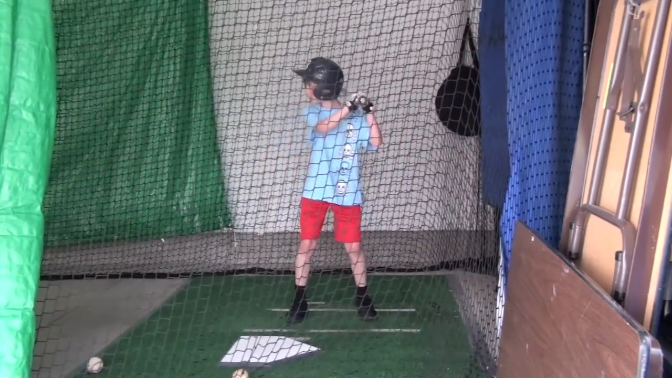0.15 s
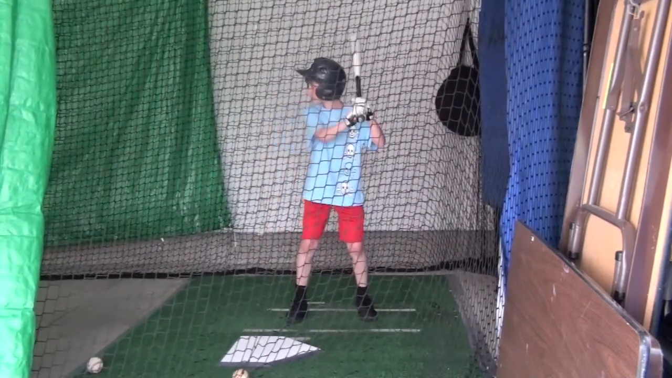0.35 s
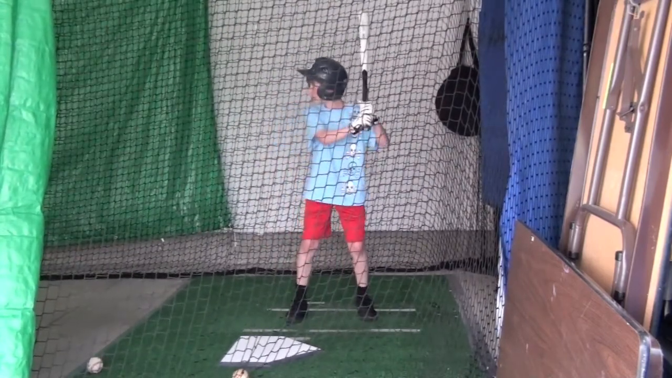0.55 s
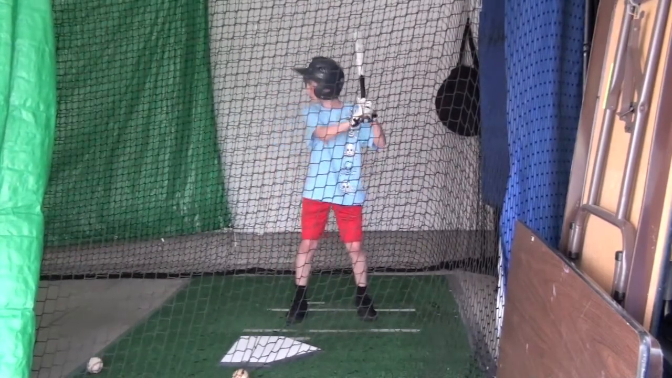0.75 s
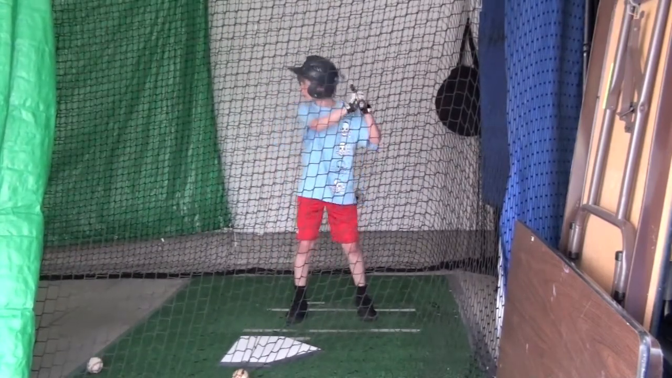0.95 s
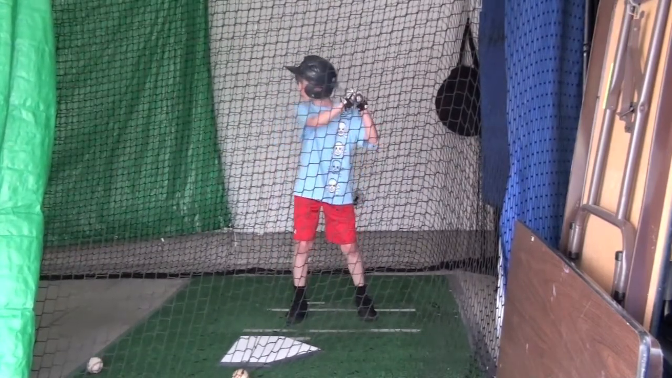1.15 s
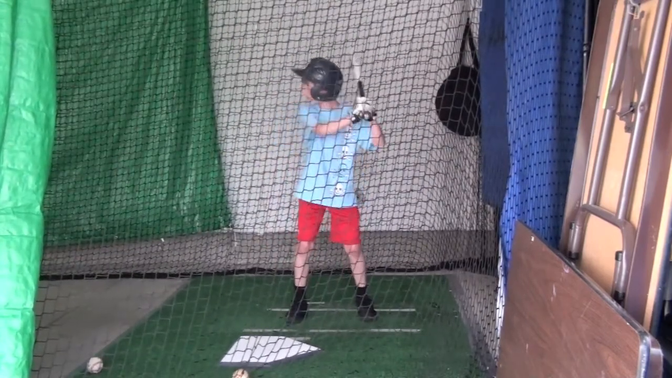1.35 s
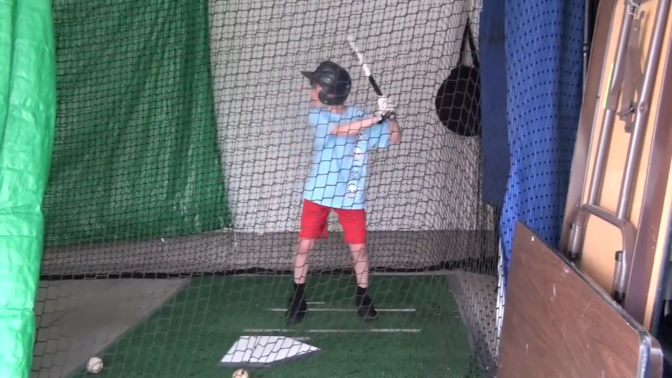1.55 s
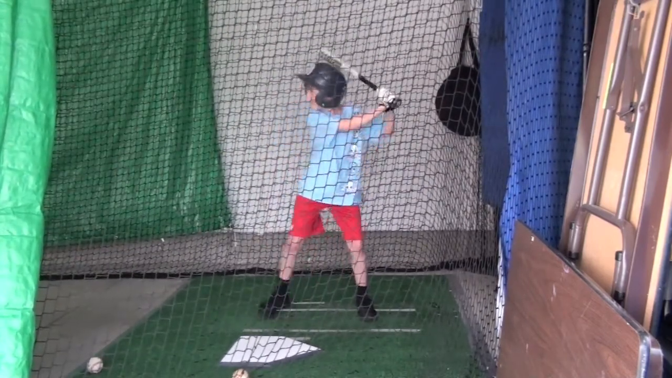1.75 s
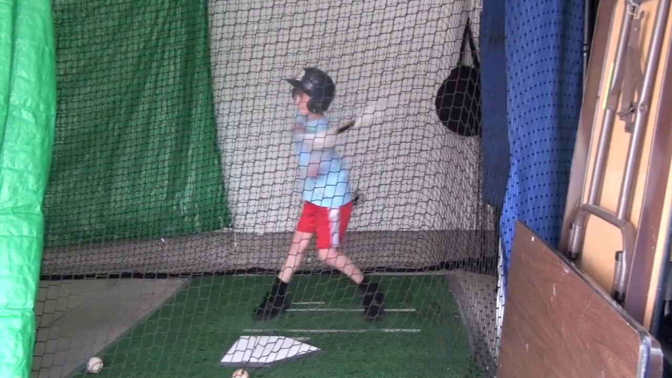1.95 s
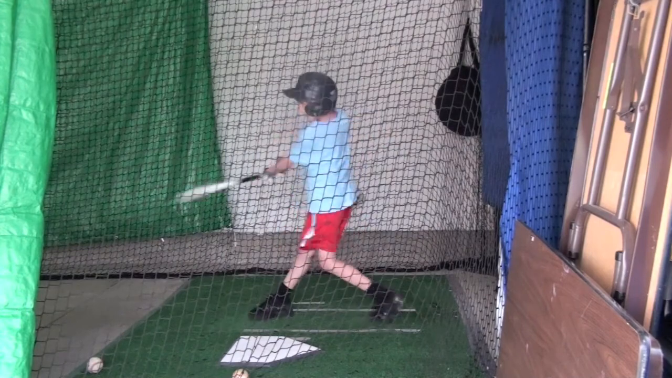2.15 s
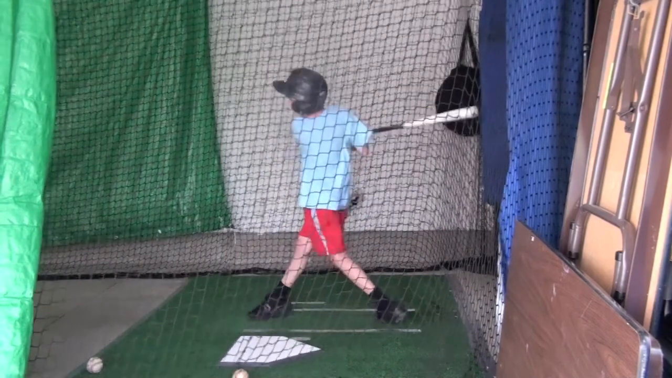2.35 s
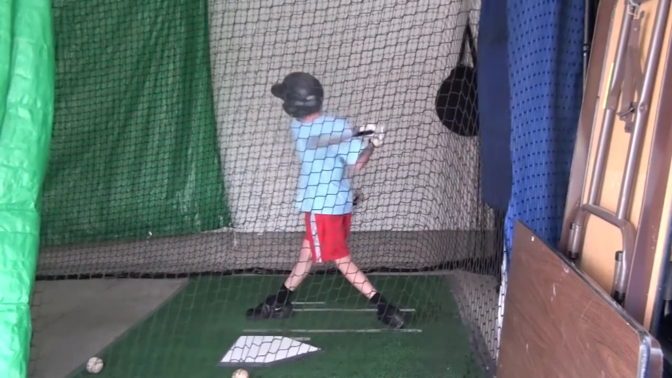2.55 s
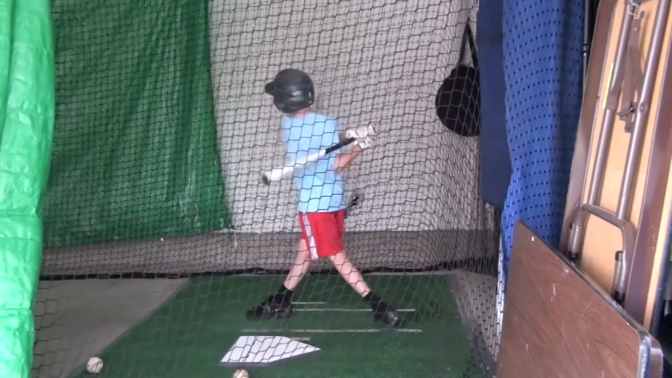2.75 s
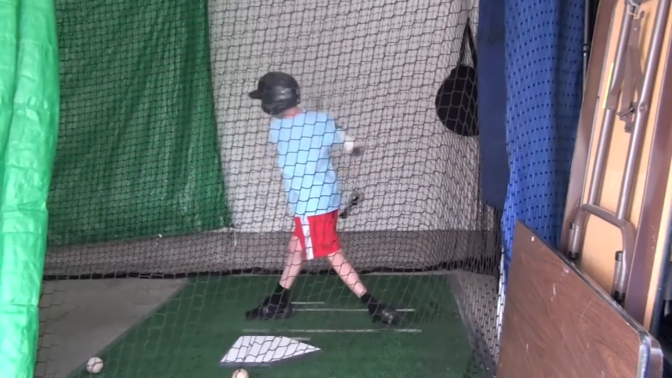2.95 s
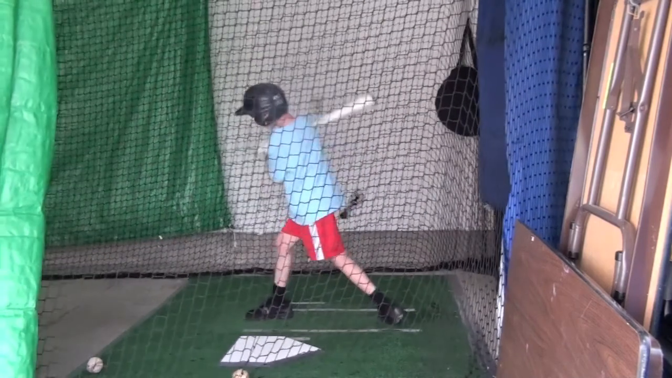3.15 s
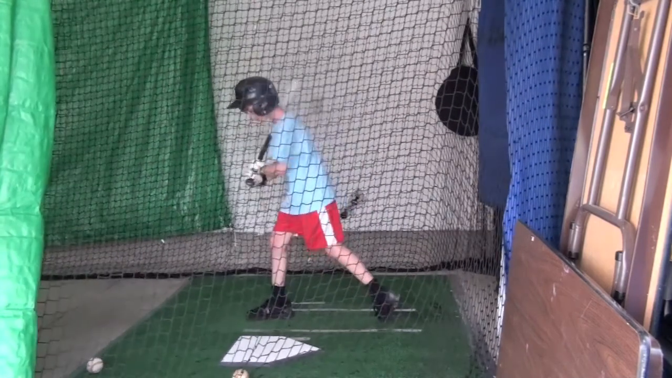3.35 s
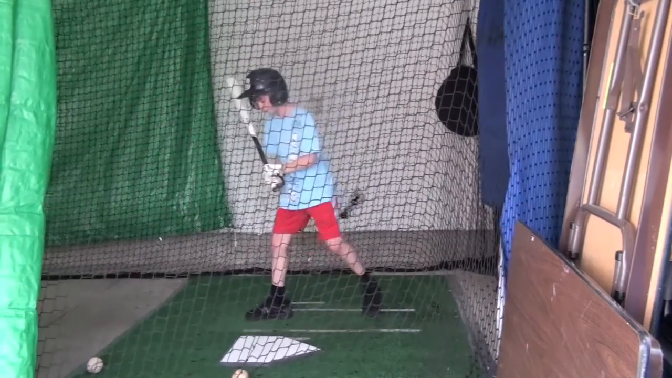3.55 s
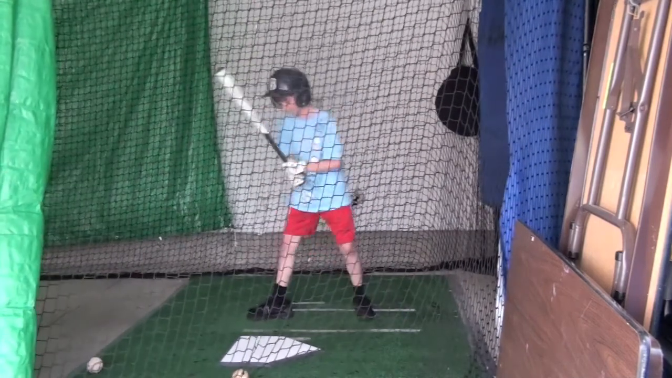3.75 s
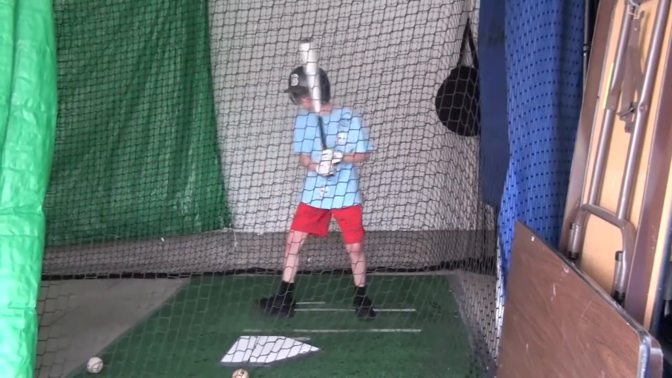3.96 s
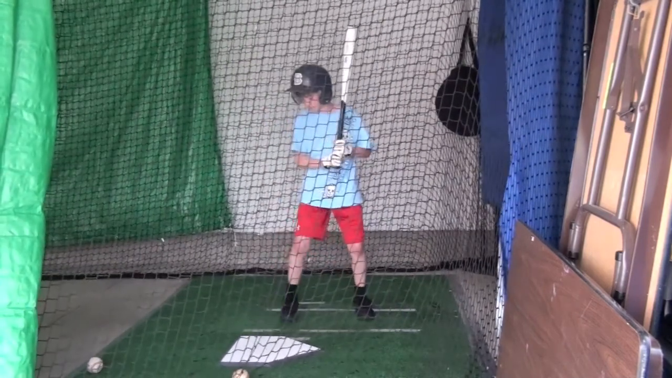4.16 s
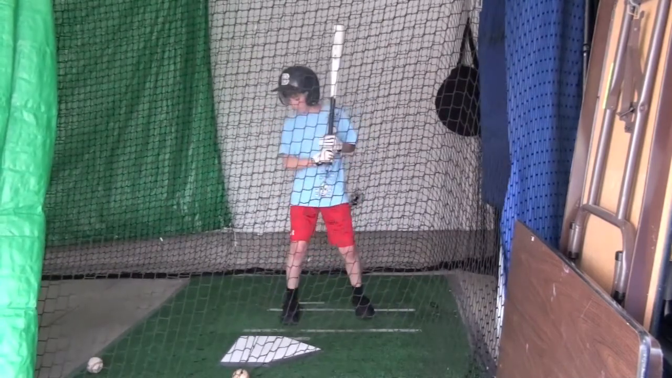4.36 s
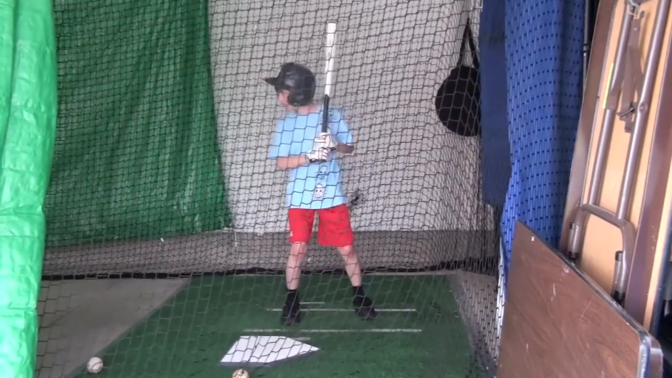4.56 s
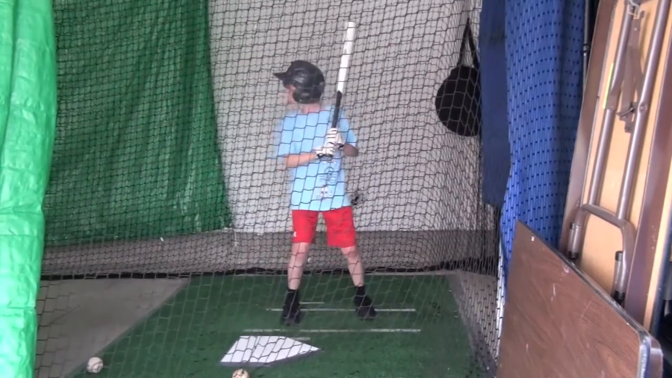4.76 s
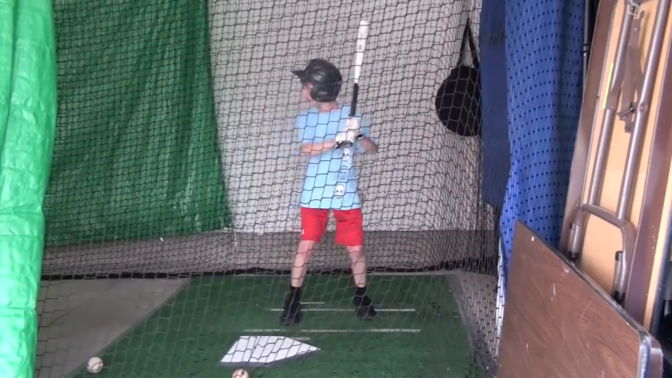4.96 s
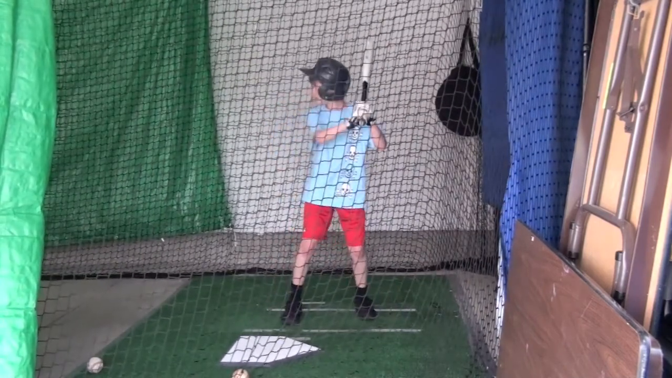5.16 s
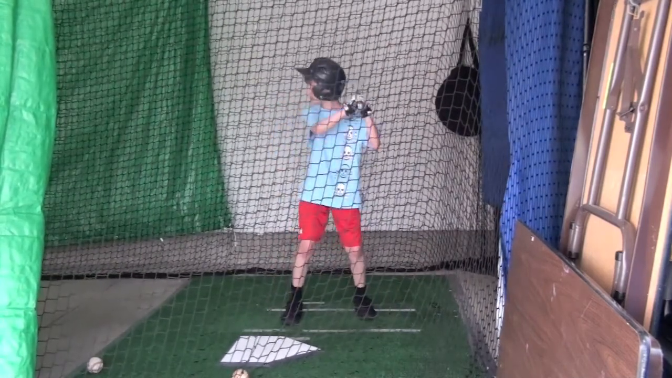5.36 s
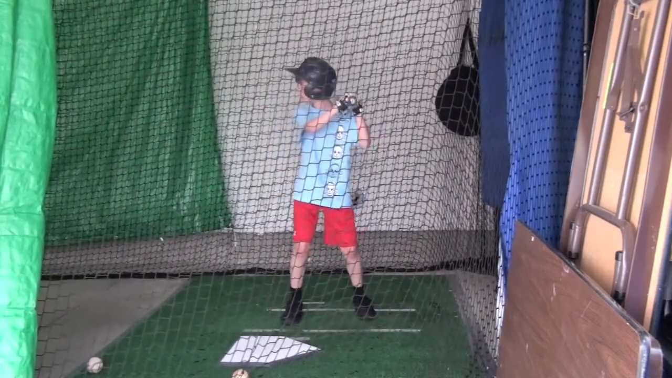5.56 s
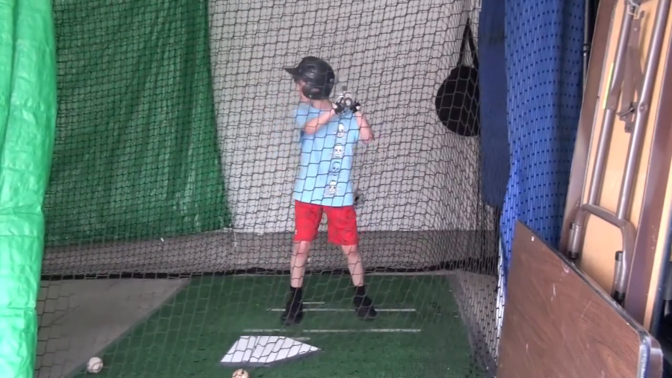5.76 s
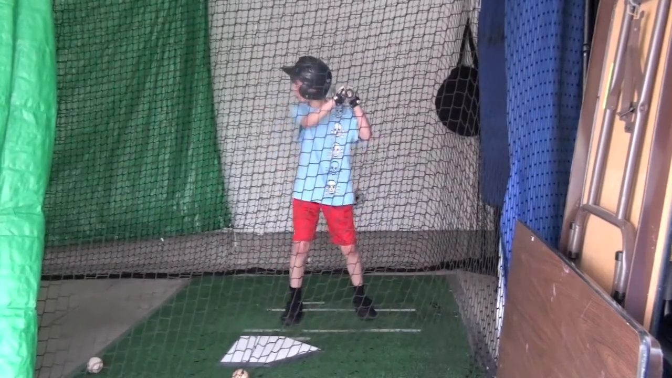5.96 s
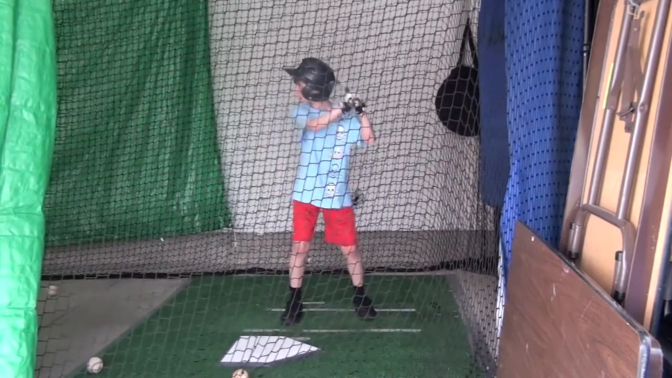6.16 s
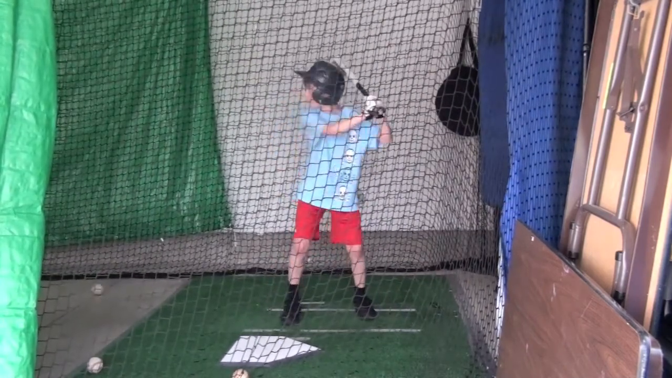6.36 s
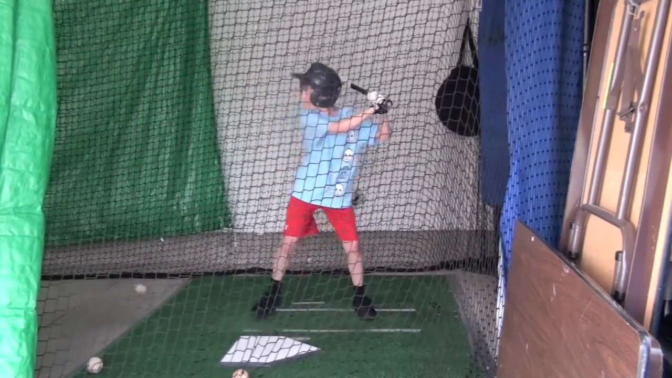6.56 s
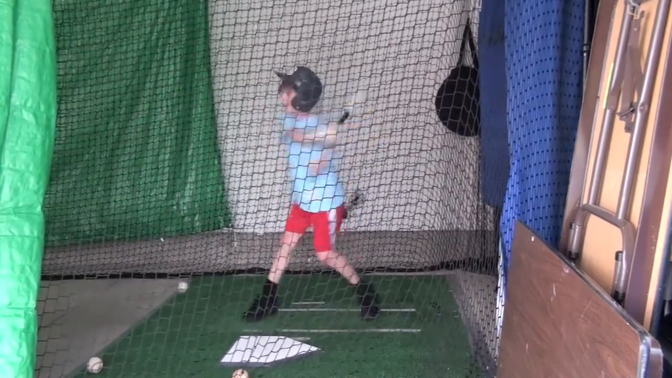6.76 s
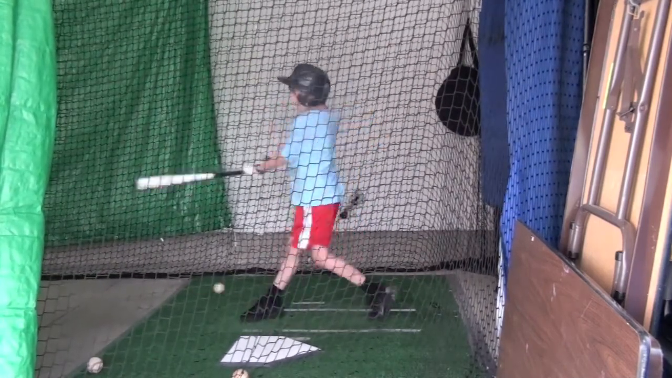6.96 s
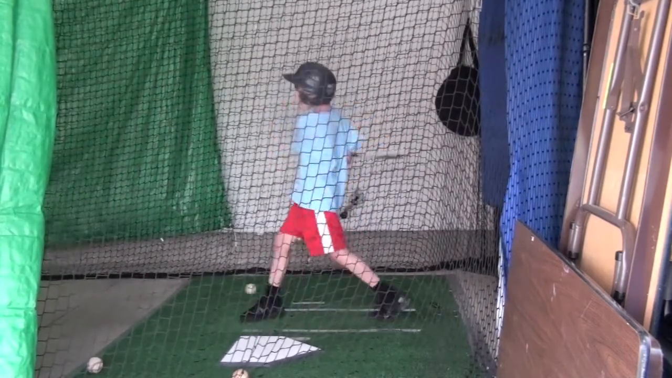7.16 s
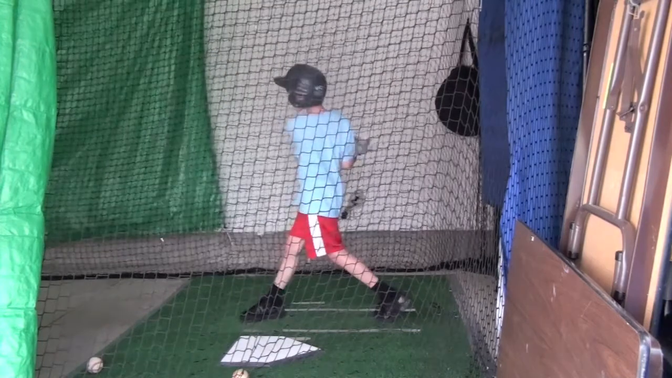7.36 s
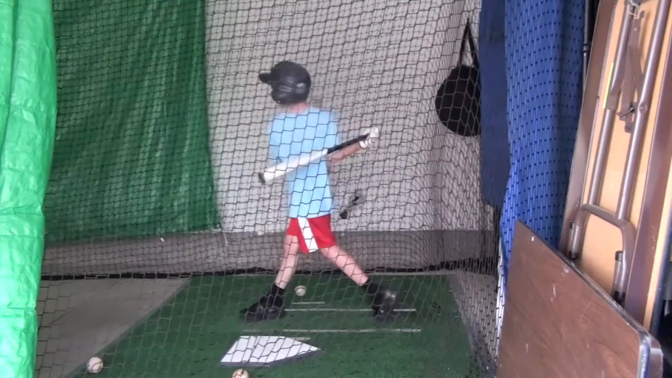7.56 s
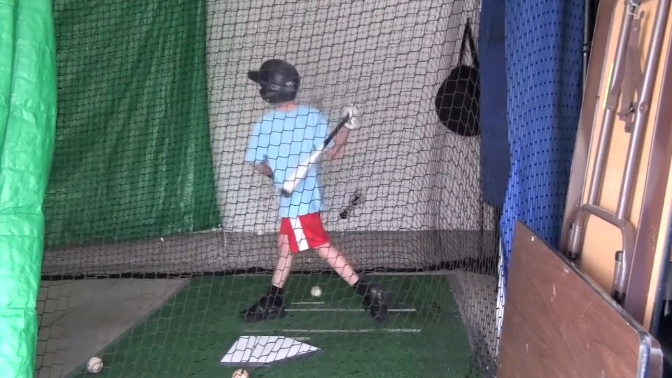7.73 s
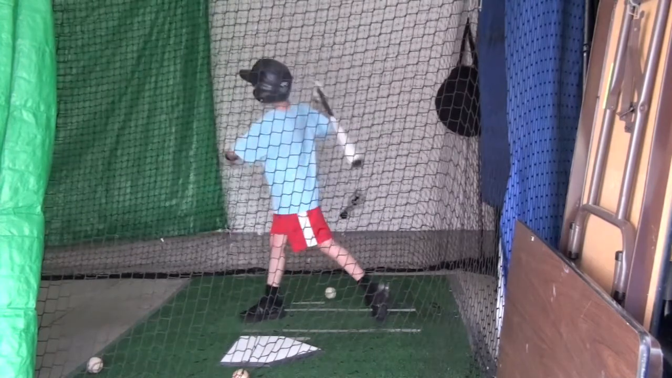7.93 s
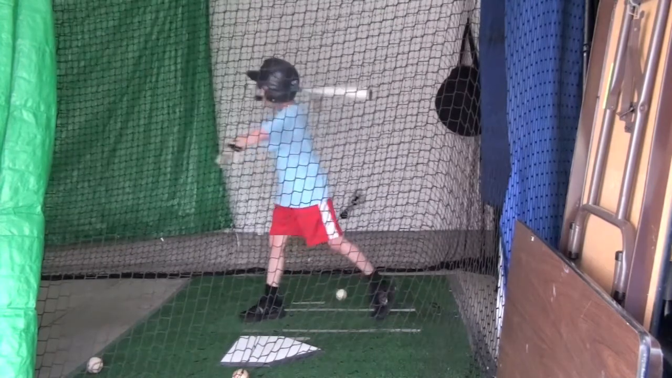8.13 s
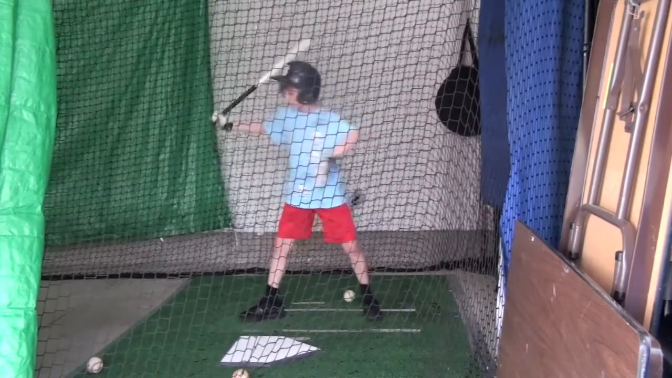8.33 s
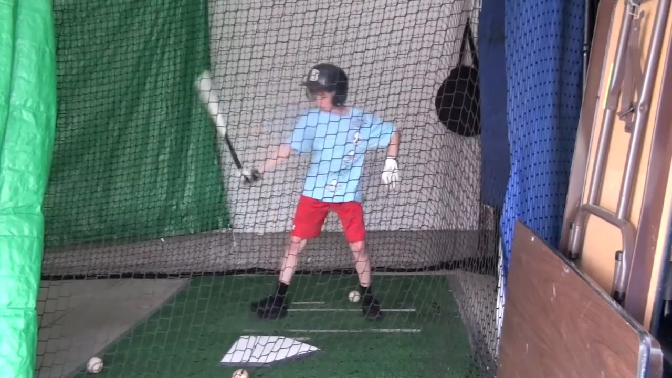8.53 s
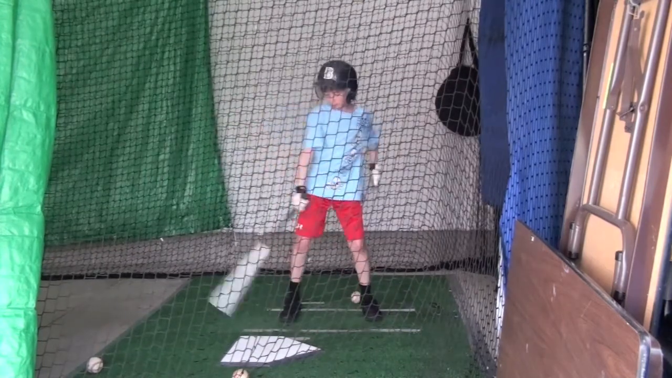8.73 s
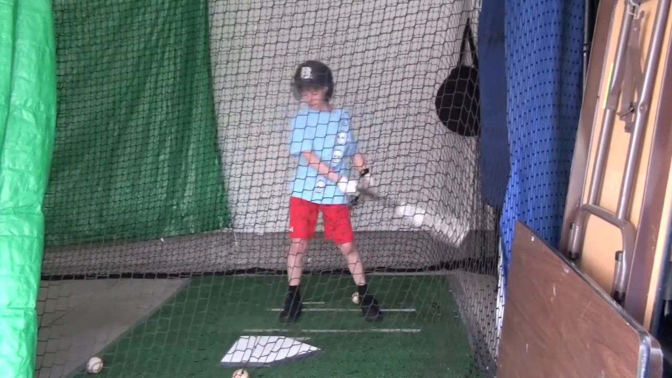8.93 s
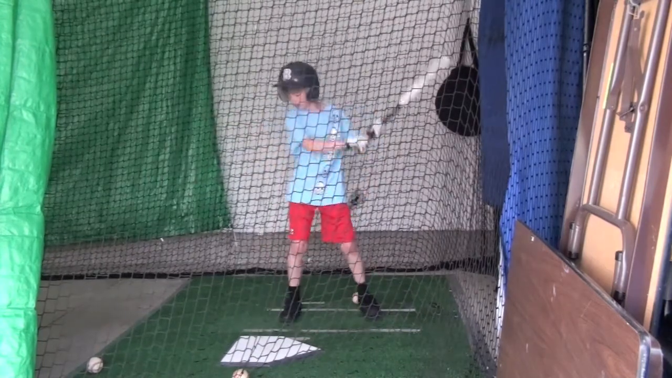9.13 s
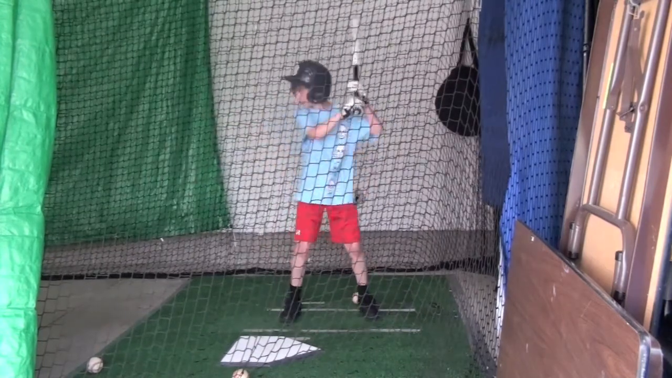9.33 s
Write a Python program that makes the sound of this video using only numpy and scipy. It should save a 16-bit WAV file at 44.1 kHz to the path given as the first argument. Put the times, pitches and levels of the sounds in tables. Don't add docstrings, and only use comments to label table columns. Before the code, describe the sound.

Two bright ringing bat hits, seconds apart, break quiet garage air, followed by ball knocks, scuffing soles and dull fading bounces.

```python
import sys
import numpy as np
from scipy import signal
from scipy.fft import rfft, irfft
from scipy.io import wavfile
from scipy.ndimage import uniform_filter1d, map_coordinates

SR = 44100
rng = np.random.default_rng(int(sys.argv[2]) if len(sys.argv) > 2 else 0)


def store_wav(level_fs):
    pcm = np.round(np.clip(np.atleast_2d(level_fs), -1, 1) * 32767)
    wavfile.write(sys.argv[1], SR, pcm.T.astype(np.int16))


def gain_from_decibels(decibels):
    exponent = np.asarray(decibels, float) / 20
    return 10 ** exponent


N = 418509
TIME = np.arange(N) / SR

# (frequency [Hz], left-right correlation [-1..1])
ROOM_LIKENESS = [(100, .8), (200, 0.94), (600, 0.78), (3000, 0.79), (9000, 0.78), (14000, 1)]


def unit(x):
    return x / np.sqrt(np.mean(x ** 2) + 1e-20)


def along(points, hz):
    f, v = np.transpose(points)
    return np.interp(np.log(hz + 1), np.log(f + 1), v)


def curve(rows, t):
    s, v = np.transpose(rows)
    return np.interp(t, s, v)


def wobble(rate_hz, size=N):
    knots = rng.standard_normal(int(size * rate_hz / SR) + 4)
    return map_coordinates(knots, [TIME[:size] * rate_hz])


def fade(t, start_s, end_s, edge_s):
    return np.clip((t - start_s) / edge_s, 0, 1) * np.clip((end_s - t) / edge_s, 0, 1)


def add(out, s, x):
    place = out[..., round(s * SR):][..., :x.shape[-1]]
    place += x[..., :place.shape[-1]]


def pair(size, spectrum, likeness):
    hz = np.fft.rfftfreq(size, 1 / SR)
    angle = np.arccos(np.clip(along(likeness, hz), -1, 1)) / 2
    noise = rfft(rng.standard_normal((2, size))) * gain_from_decibels(along(spectrum, hz))
    mid, side = irfft(noise * [np.cos(angle), np.sin(angle)], size)
    return unit(np.array([mid + side, mid - side]))


def garage(spectrum, rise_s, direct_db, direct_t60_s):
    # (frequency [Hz], t60 [s])
    decay = [(150, 0.49), (400, 0.67), (1000, 0.74), (2800, 0.66), (7300, .55), (14000, 0.36)]
    size = 2 ** 15
    hz, frame_s, z = signal.stft(pair(size, spectrum, ROOM_LIKENESS), SR, nperseg=256)
    z = z * gain_from_decibels(-60 * frame_s / along(decay, hz)[:, None])
    tail = signal.istft(z, SR, nperseg=256)[1][:, :size]
    t = TIME[:size]
    build_up = 1 - np.exp(-t / rise_s)
    direct = gain_from_decibels(direct_db - 60 * t / direct_t60_s) * np.clip(3 * t / rise_s, 0, 1)
    return tail * (build_up + direct)


def blows(table, spectrum, direct_t60_s):
    out = np.zeros((2, N))
    for s, db, rise_s, direct_db, pan_db in table:
        gain = gain_from_decibels(db + np.array([[pan_db], [-pan_db]]) / 2)
        add(out, s, gain * garage(spectrum, rise_s, direct_db, direct_t60_s))
    return out


def roomy(x, wet_db):
    tail = garage([(100, 0.0099), (16000, 0.00099)], rise_s=0.0023, direct_db=-37.0, direct_t60_s=0.01)
    tail = tail / np.linalg.norm(tail[0])
    wet = signal.fftconvolve(x[None], tail, axes=1)[:, :len(x)]
    return x + gain_from_decibels(wet_db) * wet


def ringing(modes, db, attack_s):
    t = TIME[:SR]
    tones = np.zeros(SR)
    for hz, level_db, t60_s in modes:
        strength_db = db + level_db + 2 * rng.standard_normal()
        tones += gain_from_decibels(strength_db - 60 * t / t60_s) * np.sin(2 * np.pi * hz * t)
    return tones * (1 - np.exp(-t / attack_s))


def outside():
    # (frequency [Hz], level [dB])
    air_colour = [(20, -39), (40, -8.5), (88, -10), (142, -6.5), (250, -4), (400, -13), (574, -17),
                  (900, -27), (1610, -24), (3070, -28), (7520, -37), (15000, -41.5), (15700, -54),
                  (15900, -89)]
    # (frequency [Hz], level [dB])
    car_colour = [(120, -42), (200, -14), (264, -1), (601, -10.5), (1070, -7.5), (2110, -15), (2560, -21.5),
                  (3960, -22.5), (10500, -39), (13000, -40)]
    # (frequency [Hz], left-right correlation [-1..1])
    likeness = [(60, 0.99), (150, 1), (380, 0.96), (950, 0.68), (2380, 0.58), (5980, 0.49), (15000, 0.74)]
    # (time [s], level [dB])
    breeze = [(0, 0.5), (3, -1), (5, 1), (7, -0.5), (8, -5), (9.49, -2)]
    air_db = -45.5 + curve(breeze, TIME) + 0.94 * wobble(6)
    car_db = -40 - 1.82 * TIME + 0.56 * wobble(4.04)
    hum_db = -50 + 1.4 * wobble(2.46) + 1.6 * wobble(23)
    hum_hz = 59 + 0.67 * wobble(4.9)
    air = gain_from_decibels(air_db) * pair(N, air_colour, likeness)
    car = gain_from_decibels(car_db) * pair(N, car_colour, likeness)
    hum = gain_from_decibels(hum_db) * np.sin(2 * np.pi * np.cumsum(hum_hz) / SR)
    return air + car + hum


def note(s, length_s, from_hz, to_hz, db, fade_db_per_s, trill):
    t = TIME[:round(length_s * SR)]
    slide_hz = to_hz + (from_hz - to_hz) * np.exp(-t / 0.03)
    hz = slide_hz * (1 + trill[round(s * SR):][:len(t)])
    level = gain_from_decibels(db - fade_db_per_s * t) * fade(t, 0, length_s, edge_s=0.008)
    return level * np.sin(2 * np.pi * np.cumsum(hz) / SR)


def birds():
    # (time [s], length [s], start [Hz], held pitch [Hz], level [dB])
    whistles = [
        (.11, .03, 4700, 4620, -51),
        (.58, .06, 4000, 4000, -58),
        (4.783, .13, 3880, 3970, -54),
        (5.394, .2, 4750, 4620, -64),
        (5.514, 0.17, 3750, 4260, -60),
        (6.239, 0.42, 2450, 3470, -46.5),
        (6.746, .12, 3150, 3460, -50),
    ]
    # (time [s], length [s], start [Hz], held pitch [Hz], level [dB])
    buzzes = [
        (1.38, 0.5, 2654, 2590, -48),
        (2.919, 0.57, 2600, 2670, -52.5),
        (5.196, 0.077, 3220, 3230, -59),
        (6.241, 0.15, 2550, 2990, -52),
        (6.612, 0.2, 2850, 3030, -49.5),
    ]
    # (time [s], level [dB])
    chips = [
        (5.3, -53),
        (5.56, -52),
        (5.73, -55),
        (5.891, -53),
        (6.06, -58),
        (6.22, -54),
    ]
    chip_s, chip_top_hz, chip_low_hz = 0.021, 3520, 2850
    song = np.zeros(N)
    trill_hz = 80 + 20 * wobble(40)
    phase = 2 * np.pi * np.cumsum(trill_hz) / SR + 0.78 * wobble(150)
    zigzag = np.arcsin(np.sin(phase)) * 2 / np.pi
    falling = [(s, chip_s, chip_top_hz, 2 * chip_low_hz - chip_top_hz, db) for s, db in chips]
    for row in whistles + falling:
        add(song, row[0], note(*row, fade_db_per_s=58, trill=0 * zigzag))
    for row in buzzes:
        add(song, row[0], note(*row, fade_db_per_s=0, trill=0.1204 * zigzag))
    return roomy(song * gain_from_decibels(3.5 * wobble(70)), wet_db=0.1)


def strokes(table):
    t = TIME[::64]
    s, db, rise_s, fall_s = np.transpose(table)[..., None]
    away = np.where(t < s, (s - t) / rise_s, (t - s) / fall_s)
    return np.interp(TIME, t, gain_from_decibels(db - 13 * away ** 1.16).sum(axis=0))


def shoes():
    # (peak time [s], level [dB], rise [s], fall [s])
    steps = [(1.9, -57, 0.038, 0.21), (2.14, -46, .25, 0.0093), (2.5, -48.5, .01, 0.63),
             (2.72, -55.5, 0.012, 0.21), (3.53, -56, .04, .04), (4.5, -58, .01, .13), (4.74, -63, .06, .08),
             (4.91, -58, .1, 0.14), (5.2, -56, .15, .06), (6.48, -58, 0.12, 0.088),
             (6.74, -56, 0.075, 0.22), (6.9, -47.5, 0.15, 0.18), (7.5, -51.5, 0.063, 0.23),
             (7.62, -54, 0.052, 0.071), (7.78, -49.5, 0.053, 0.22), (7.94, -62.5, 0.027, 0.19),
             (8.55, -58, 0.93, 0.054), (8.65, -55, 0.057, 0.043), (8.74, -50.5, 0.04, 0.24),
             (9.16, -56.5, 0.14, 0.14), (9.34, -54, 0.063, 0.14)]
    # (peak time [s], level [dB], rise [s], fall [s])
    slides = [
        (3.77, -44, 0.071, 0.22),
        (3.91, -44.5, 0.17, 0.16),
    ]
    # (frequency [Hz], level [dB])
    scuff_colour = [(470, -16), (800, -1), (1180, -2.5), (1900, -3), (3340, -5), (3830, -4.5), (11700, -15),
                    (15000, -23), (16000, -29)]
    # (frequency [Hz], level [dB])
    drag_colour = [(1180, -31), (2000, -12), (2780, -8), (3260, 1), (3550, -10.5), (4190, -3), (5210, -5),
                   (7190, -14.5), (7840, -16.5), (13800, -25.5), (15500, -37), (16000, -67)]
    grain = gain_from_decibels(0.79 * wobble(300) + 1.1 * wobble(40))
    scuffs = gain_from_decibels(5.0) * strokes(steps) * pair(N, scuff_colour, ROOM_LIKENESS)
    drags = strokes(slides) * pair(N, drag_colour, ROOM_LIKENESS)
    return grain * (scuffs + drags)


def balls():
    bursts = [
        (2.152, -20.5, .002, 23, 0),
        (2.164, -20.5, 0.0022, 14, 0),
        (7.17, -19, 0.048, -30, 0),
        (7.198, -12, 0.02, -30, 0.004),
        (7.25, -19.5, 0.0064, -25, 0.0033),
        (7.1, -25, 0.011, 6, 0),
        (2.825, -56, .006, 3, 0.0035),
        (7.616, -41, .004, 13, 0),
        (8.14, -52, .004, 9, 0),
    ]
    brushes = [
        (8.815, -34, 0.0079, -30, 0),
        (9.32, -39, 0.029, -30, 0),
    ]
    knocks = [
        (.001, -40, 0.0044, -13, 0.0046),
        (3.02, -33, 0.035, -30, 0.0067),
        (3.151, -37, .003, -1, 0),
        (3.158, -20, 0.0037, 5, 0),
        (3.176, -21, 0.0061, 6, 0.0066),
        (4.108, -32.5, 0.0052, 10, 0.014),
    ]
    taps = [
        (4.113, -24, 0.0094, -5, 0),
    ]
    bounces = [
        (7.265, -21.5, .01, -11, 3),
        (7.615, -30.5, 0.015, 5.5, -0.5),
        (7.933, -38.5, 0.014, 0, 0),
        (8.139, -45, .012, 1, 1),
        (8.268, -46.5, 0.014, 6, 1),
        (4.75, -49.5, 0.0082, -4, 0),
        (4.9, -50, .01, 9, -3),
        (6.24, -45, 0.023, -2, -2),
        (6.36, -44, 0.015, -2, 0),
    ]
    # (frequency [Hz], level [dB])
    mesh_colour = [(1180, -0.5), (2000, 3.5), (4120, -1.5), (7250, -7.5), (11900, -14), (14500, -19),
                   (16000, -63)]
    # (frequency [Hz], level [dB])
    brush_colour = [(290, -37), (500, -6), (718, -3.5), (933, -9), (1190, -3), (1340, -6), (1980, -5.5),
                    (2230, -11), (2430, -7), (2690, -12), (3060, -12), (11600, -17), (16000, -34.5)]
    # (frequency [Hz], level [dB])
    knock_colour = [(35, -54), (60, -25), (389, -8.5), (579, -4.5), (698, -9), (767, -8.5), (1380, -16.5),
                    (2710, -17), (3760, -25), (11800, -32.5), (14900, -39), (16000, -63)]
    # (frequency [Hz], level [dB])
    tap_colour = [(88, -33), (150, -3.5), (334, -4.5), (662, -3), (1480, -4.5), (1630, -6.5), (2400, -4.5),
                  (2700, -7.5), (7770, -10), (12900, -18), (16000, -34)]
    # (frequency [Hz], level [dB])
    thud_colour = [(47, -43), (80, -20), (167, -2.5), (253, 0.5), (504, -6.5), (853, -16), (1150, -20),
                   (1500, -41), (1950, -54), (3300, -120)]
    # (frequency [Hz], level over the room [dB], t60 [s])
    slab = [(165, 5, 0.13), (242, 8.5, 0.11), (321, -2, 0.1), (498, -4, 0.087), (643, -5, 0.068)]
    net = blows(bursts, mesh_colour, direct_t60_s=0.019) + blows(brushes, brush_colour, direct_t60_s=0.02)
    hard = blows(knocks, knock_colour, direct_t60_s=0.072) + blows(taps, tap_colour, direct_t60_s=0.18)
    soft = blows(bounces, thud_colour, direct_t60_s=0.09)
    for s, db, *_ in bounces:
        add(soft, s, ringing(slab, db, attack_s=0.005)[None])
    return net + hard + soft


def bat():
    # (time [s], room level [dB], build-up [s], direct burst [dB], left-right [dB])
    cracks = [
        (2.146, -1.5, 0.0057, 1, 1.5),
        (2.149, -8, 0.0029, 11, -8),
        (6.964, -2, 0.0029, -13, -1),
        (6.969, -16.5, 0.0026, 7, -3),
        (6.98, -12.5, 0.004, 3, 11.5),
    ]
    # (frequency [Hz], level [dB])
    crack_colour = [(88, -31), (150, -27), (431, -7), (1140, -7), (1660, -6), (2760, -11), (4080, -14),
                    (4950, -18.5), (7320, -23.5), (12200, -30), (16000, -49)]
    # (time [s], pitch [Hz])
    swings = [
        [(2.146, 1688), (2.2, 1745), (2.255, 1822), (2.305, 1763), (2.35, 1706), (2.45, 1694), (2.6, 1733),
         (2.95, 1745)],
        [(6.964, 1689), (7.02, 1702), (7.055, 1794), (7.085, 1701), (7.125, 1742), (7.185, 1724), (7.225, 1800),
         (7.3, 1730), (7.9, 1745)],
    ]
    # (level [dB], undamped hold [s], t60 in the hands [s], age when edge-on [s])
    rings = [
        (2, .11, 0.52, 0.0855),
        (0.5, 0.17, 0.48, 0.15),
    ]
    # (room level [dB], mirror wall level [dB])
    walls = [
        (-7, -7),
        (-7.5, -9.5),
    ]
    # (rest pitch [Hz], first hit [dB], second hit [dB], t60 [s], flutter [dB])
    barrel = [(2406, -10.5, -14, 0.47, 9), (2490, -9.5, -10, 0.59, 3), (3340, -21, -17, 0.24, 12),
              (4000, -5, -15, 0.41, 5.5), (4124, -11.5, -4.5, 0.52, 5), (4180, -18.5, -27, 0.57, 9),
              (7360, -39, -24, 0.33, 15.5)]
    # (time [s], modes as (frequency [Hz], level [dB], t60 [s]))
    touches = [
        (4.113, [(2390, -43, .28), (2440, -43, .3), (6300, -44, .3), (6550, -40, .45)]),
        (8.825, [(735, -49, .5), (1200, -49, .3), (1990, -53, .25), (2430, -55, .25), (8400, -62, .3), (9900, -56, .3), (11500, -60, .3)]),
        (9.35, [(1500, -52, .5)]),
    ]
    rest_hz, edge_dip_db, edge_s = 1745, 13, 0.0064
    age = TIME[:round(1.2 * SR)]
    pitches_hz = [rest_hz] + [mode[0] for mode in barrel]
    out = blows(cracks, crack_colour, direct_t60_s=0.016)
    for k, (swing, (room_db, wall_db)) in enumerate(zip(swings, walls)):
        start_s, end_s = swing[0][0], swing[-1][0]
        heard_hz = curve(swing, start_s + age)
        travel_s = np.cumsum(heard_hz / rest_hz - 1) / SR
        top_db, hold_s, t60_s, edge_on_s = rings[k]
        ring_db = top_db - 60 * np.maximum(0, age - hold_s) / t60_s
        ring_db -= edge_dip_db * np.exp(-((age - edge_on_s) / edge_s) ** 2)
        levels_db = [ring_db + (1.35 + 5 * age) * wobble(38.0, size=len(age))]
        for mode in barrel:
            flutter_db = mode[4] * wobble(70.4, size=len(age))
            levels_db.append(mode[1 + k] - 60 * age / mode[3] + flutter_db)

        def ring(doppler_share):
            t = age + doppler_share * travel_s
            tones = sum(gain_from_decibels(db) * np.sin(2 * np.pi * hz * t) for hz, db in zip(pitches_hz, levels_db))
            return fade(age, 0, end_s - start_s, edge_s=0.013) * tones

        add(out, start_s, roomy(ring(1), room_db) + gain_from_decibels(wall_db) * roomy(ring(-0.616), wet_db=-5.5))
    for s, modes in touches:
        add(out, s, roomy(ringing(modes, 0, attack_s=0.005), wet_db=4))
    return out


def scene():
    return (outside() + birds() + shoes() + balls() + bat()) * gain_from_decibels([[0.2], [-0.2]])


def held(need_db, climb_db_per_s):
    climb_db = climb_db_per_s * TIME
    return np.minimum.accumulate(need_db - climb_db) + climb_db


def low_pass(x):
    return signal.sosfilt(signal.butter(12, 16460, fs=SR, output="sos"), x)


def record(dry):
    top_hz = 16400
    dry = irfft(rfft(dry) * (np.fft.rfftfreq(N, 1 / SR) < top_hz), N)
    peak_db = 20 * np.log10(np.abs(dry).max(axis=0) + 1e-9)
    need_db = np.minimum(0, -4 - peak_db)
    slow_db = held(0.11 * need_db, climb_db_per_s=6.5) + held(0.18 * need_db, climb_db_per_s=3.0)
    quick_db = held(np.minimum(0, need_db - slow_db), climb_db_per_s=255)
    gain_db = uniform_filter1d(slow_db + quick_db, size=65)
    mix = np.clip(dry * gain_from_decibels(gain_db), -1, 1)
    return low_pass(mix)


dry = scene()
out = record(dry)
store_wav(out)
```